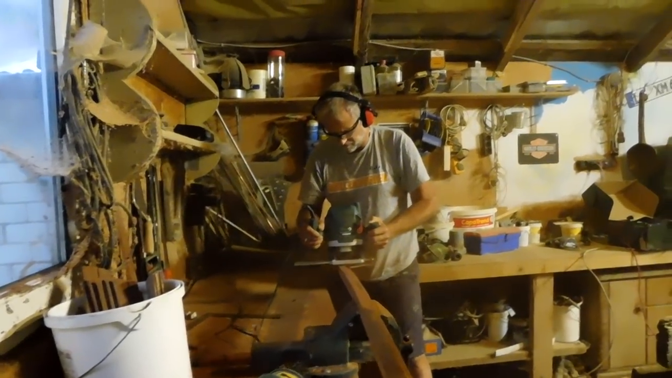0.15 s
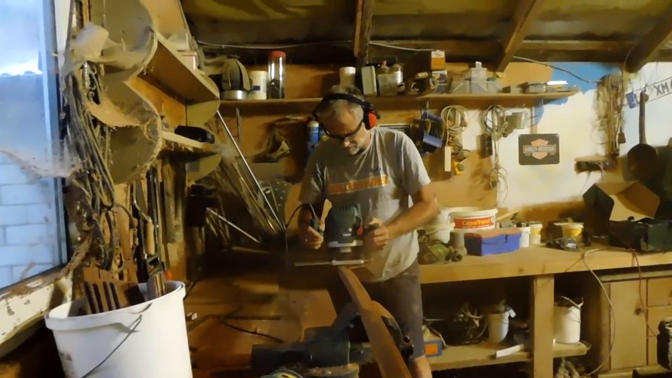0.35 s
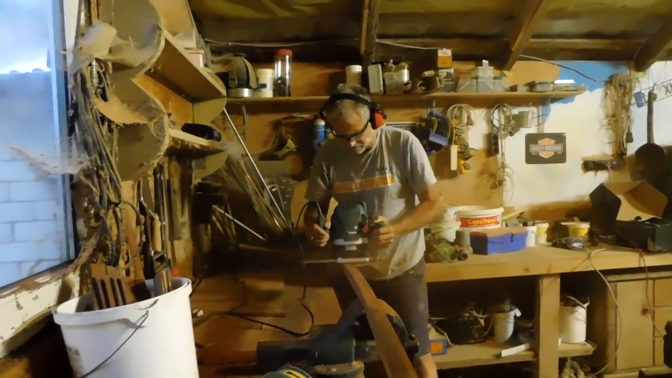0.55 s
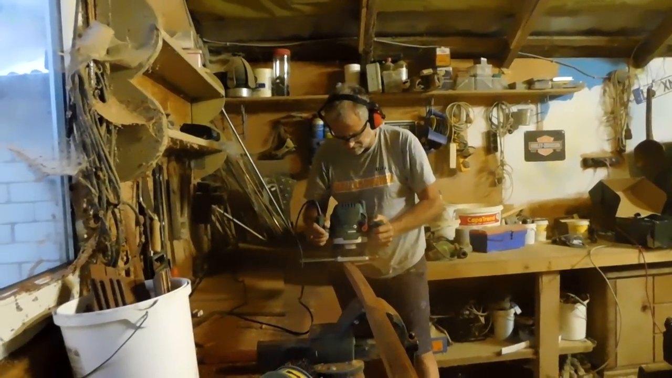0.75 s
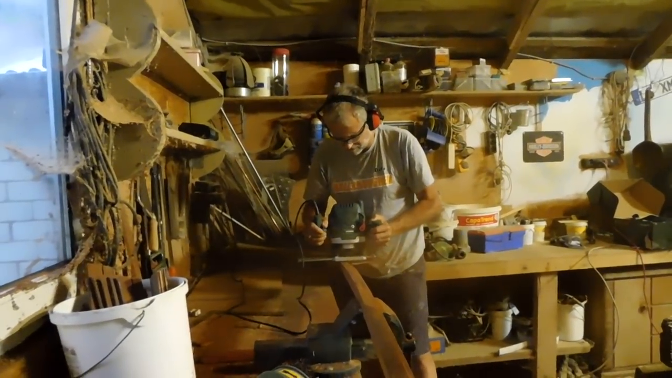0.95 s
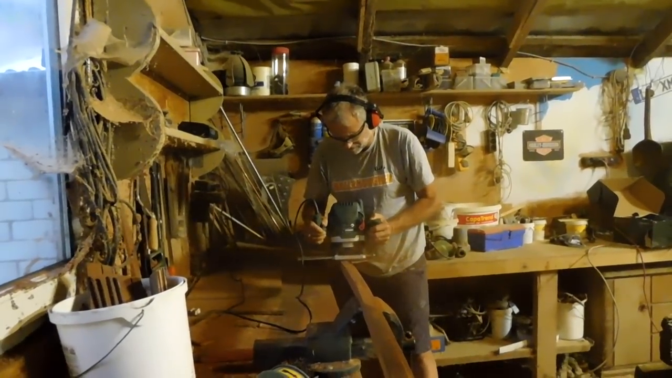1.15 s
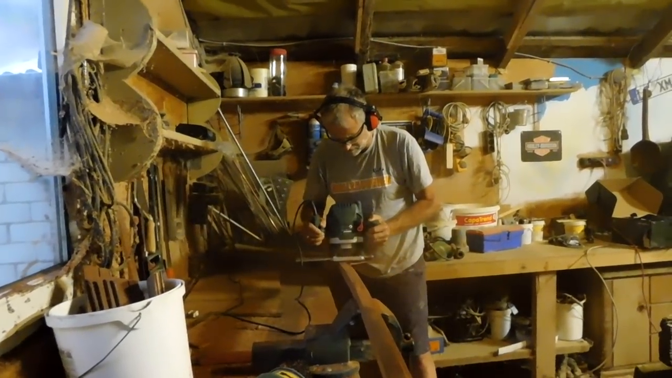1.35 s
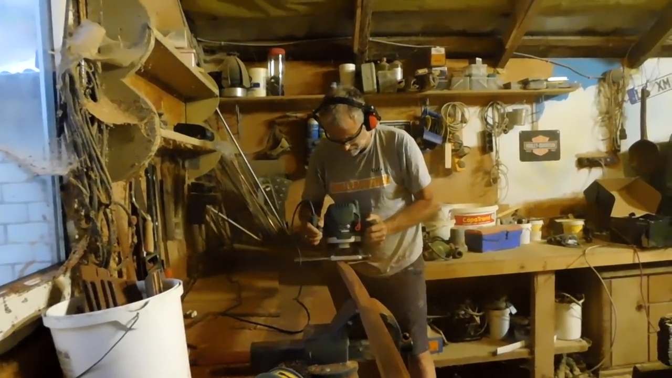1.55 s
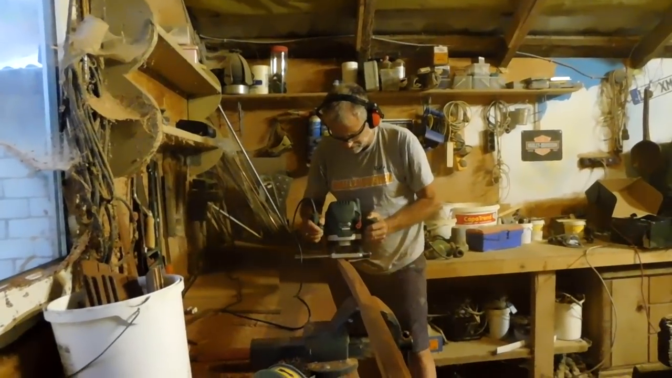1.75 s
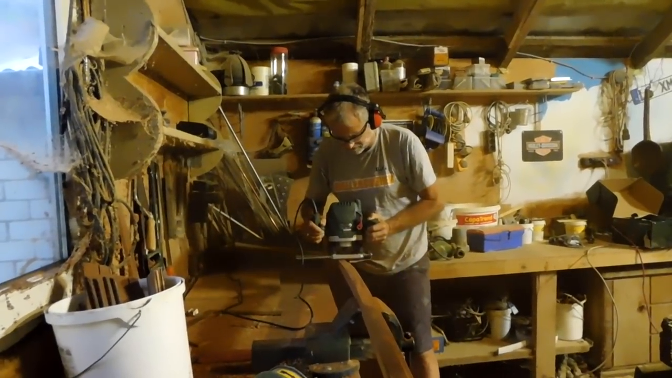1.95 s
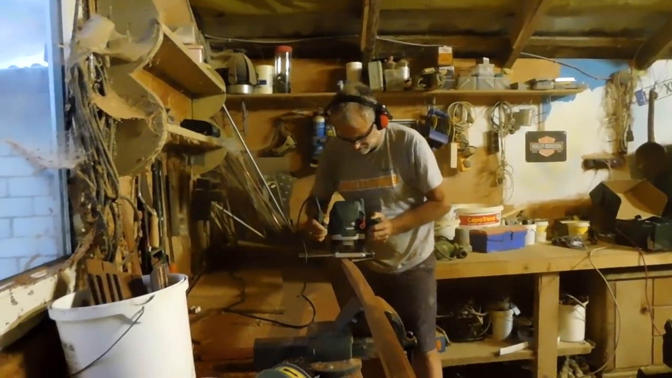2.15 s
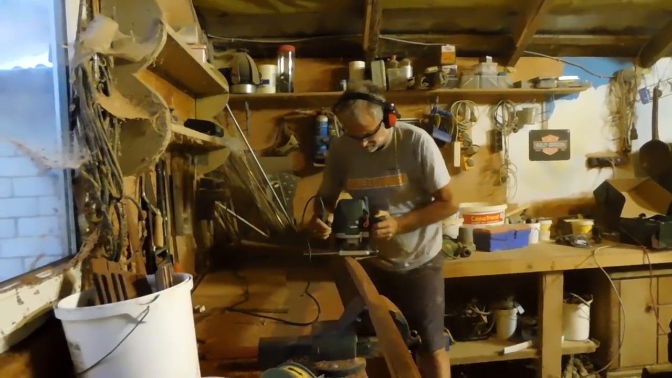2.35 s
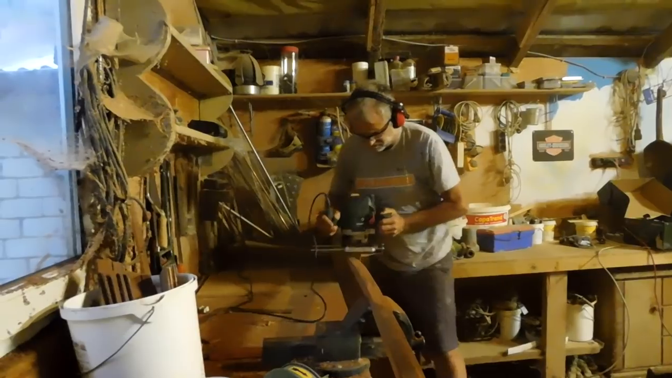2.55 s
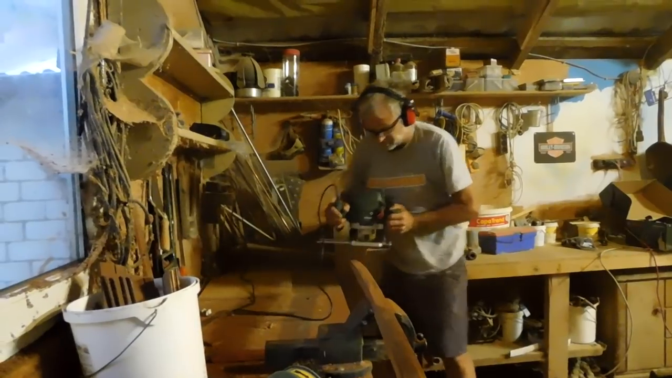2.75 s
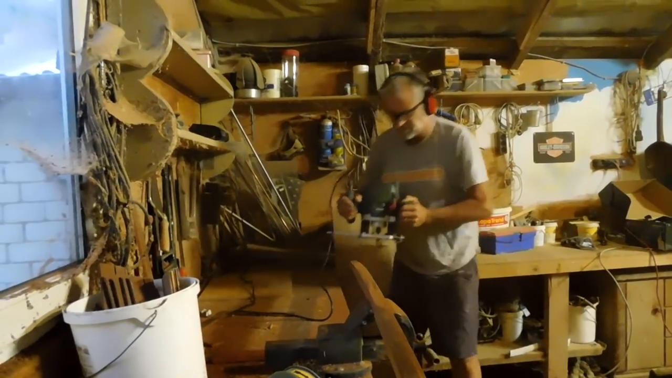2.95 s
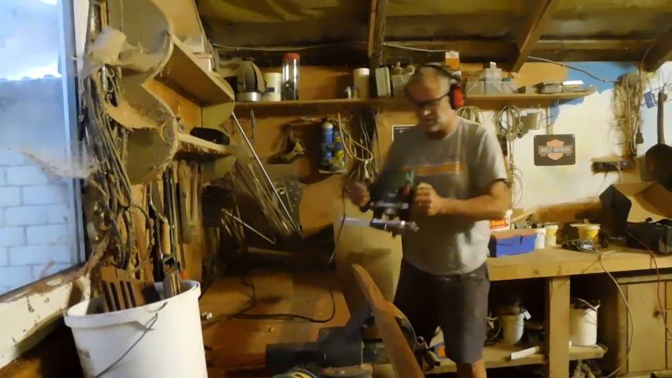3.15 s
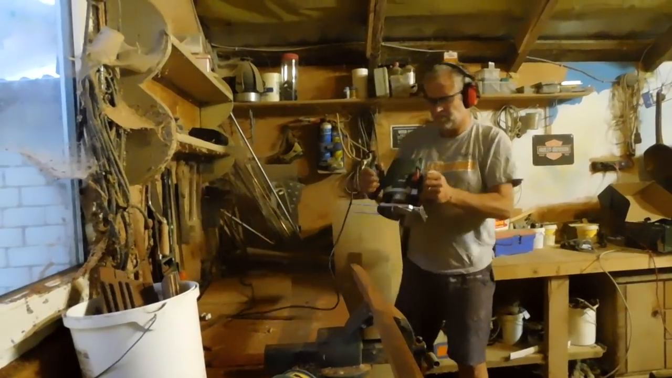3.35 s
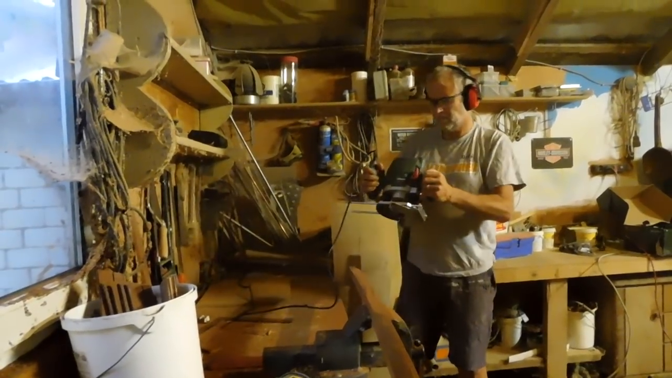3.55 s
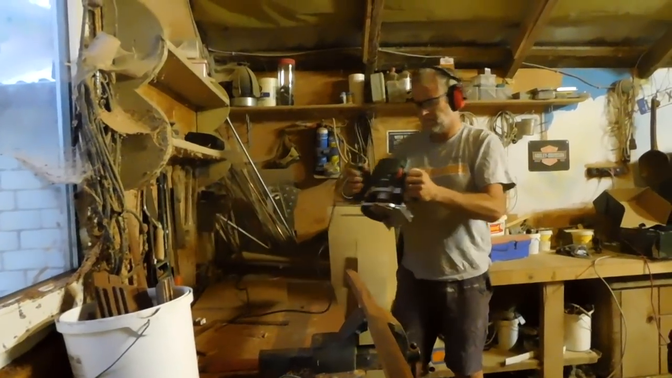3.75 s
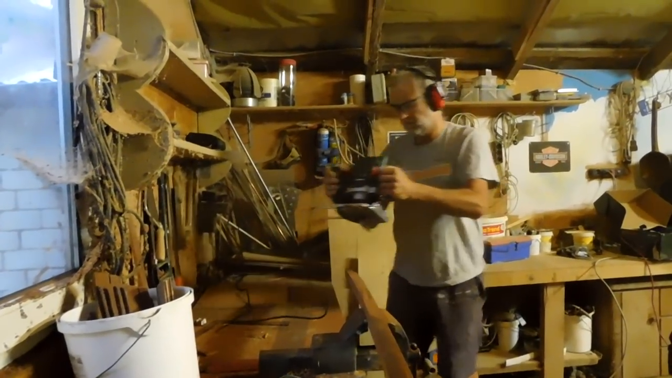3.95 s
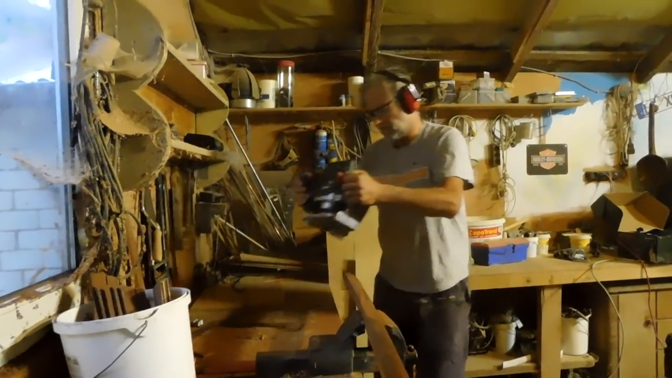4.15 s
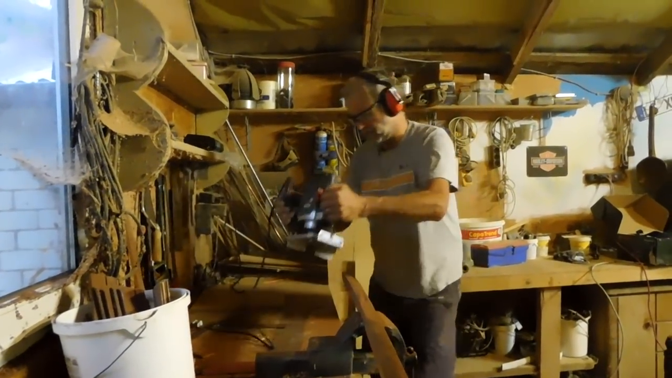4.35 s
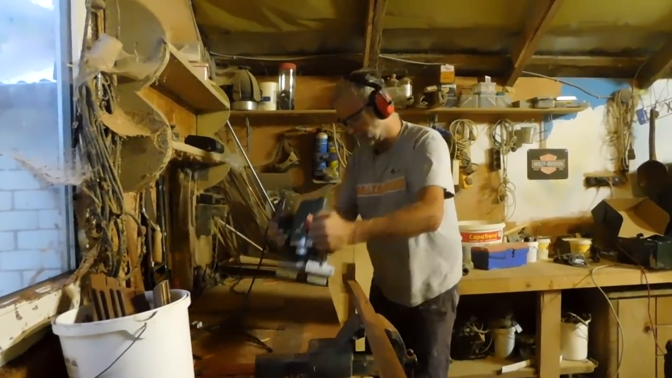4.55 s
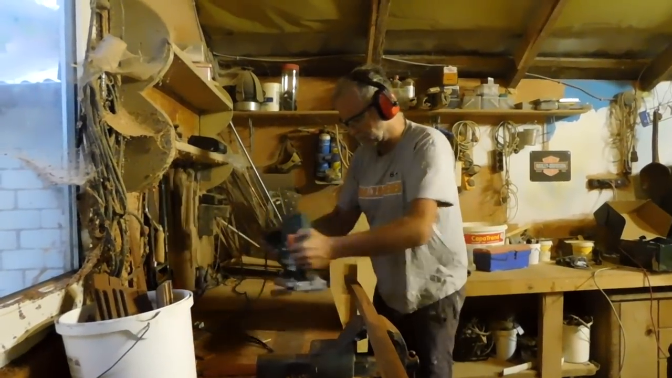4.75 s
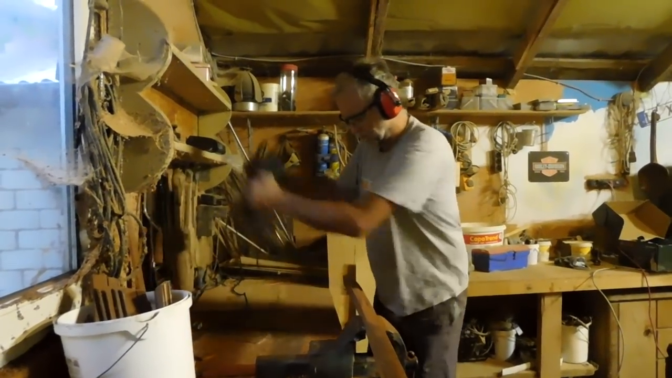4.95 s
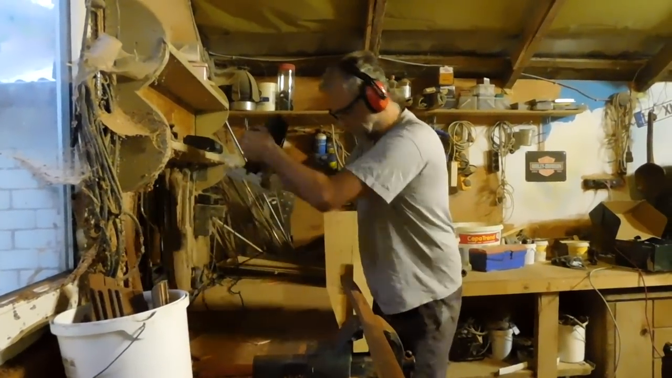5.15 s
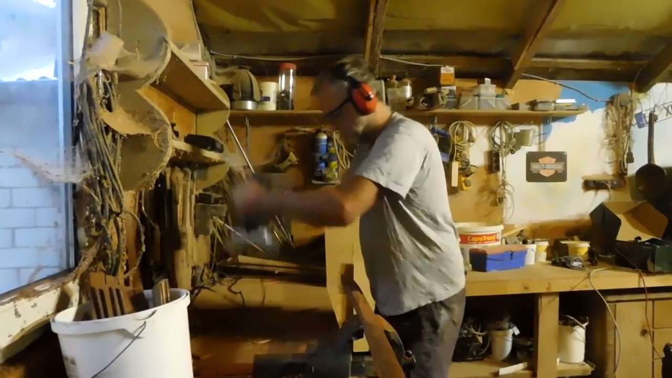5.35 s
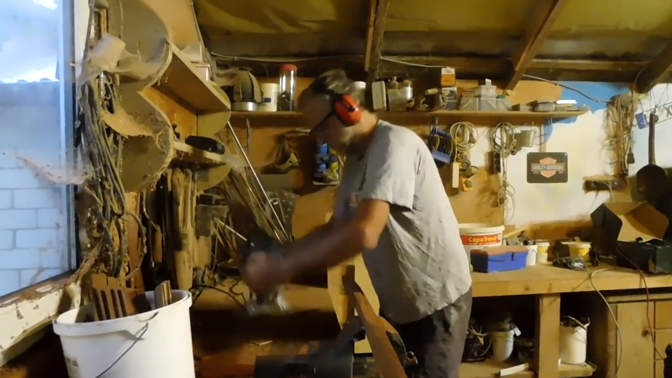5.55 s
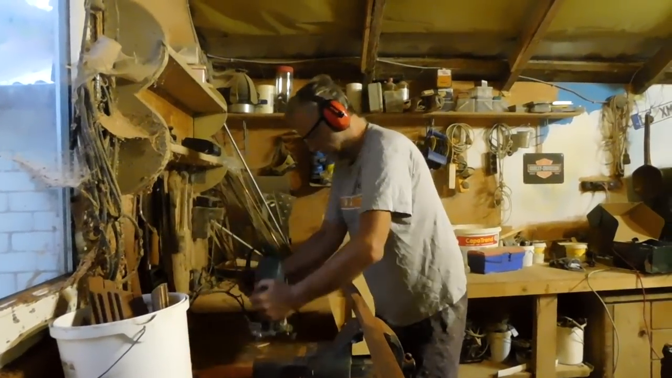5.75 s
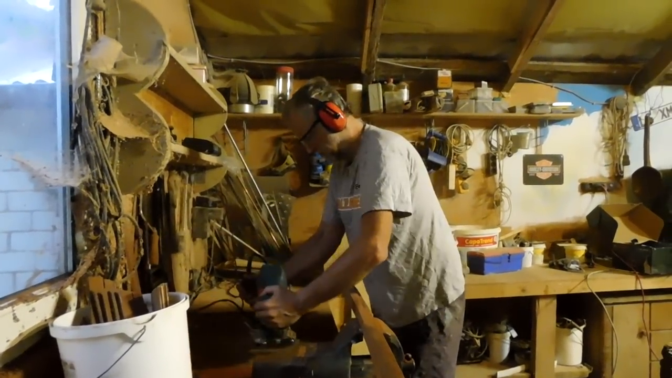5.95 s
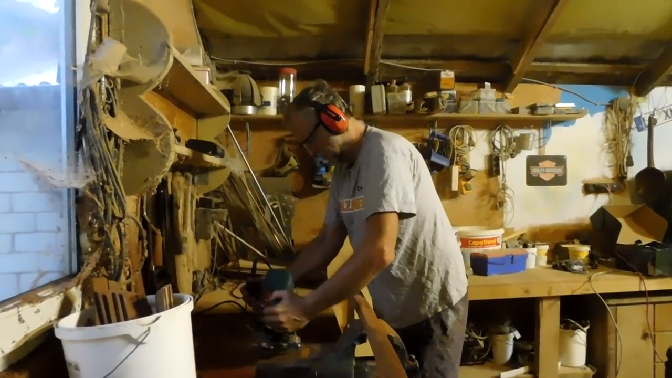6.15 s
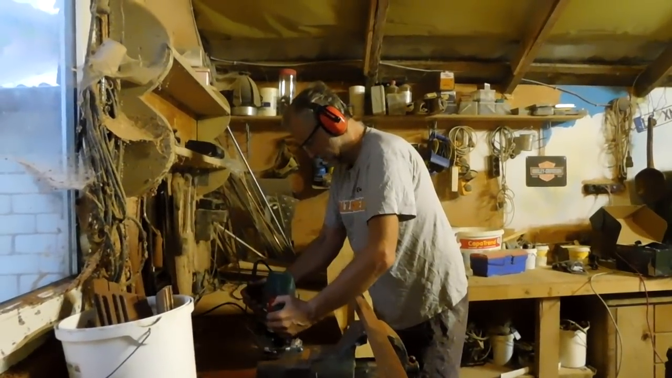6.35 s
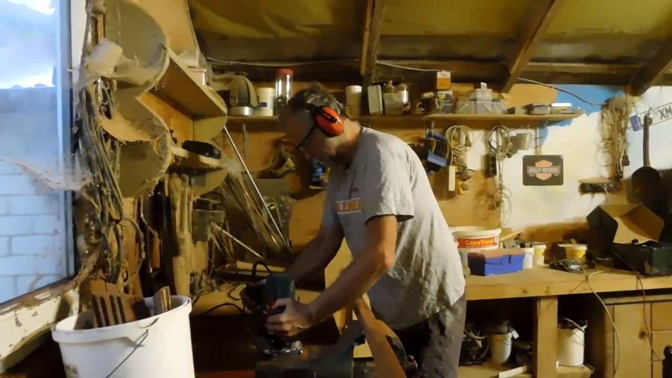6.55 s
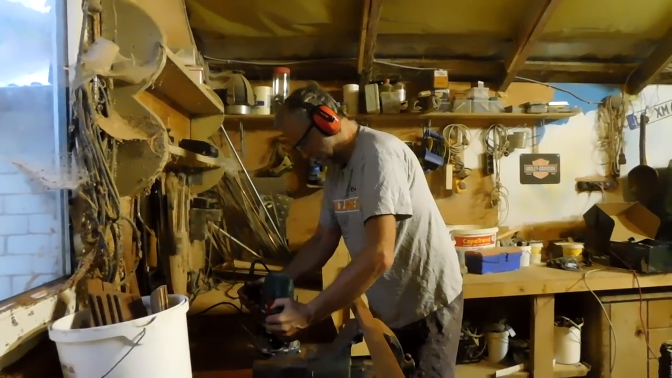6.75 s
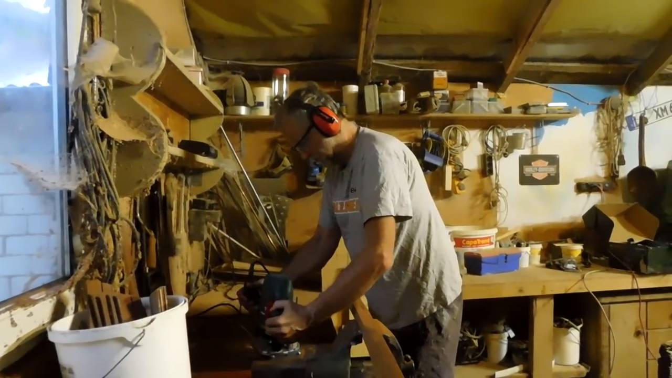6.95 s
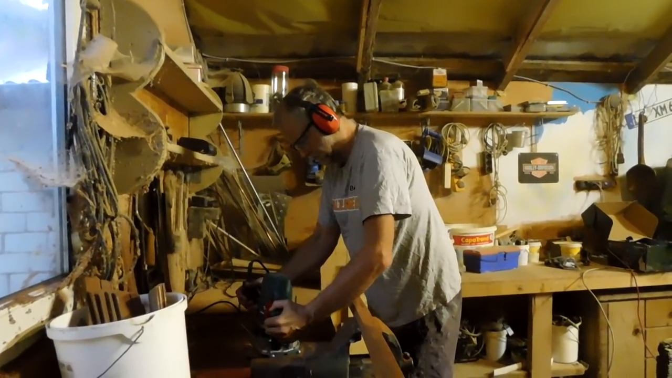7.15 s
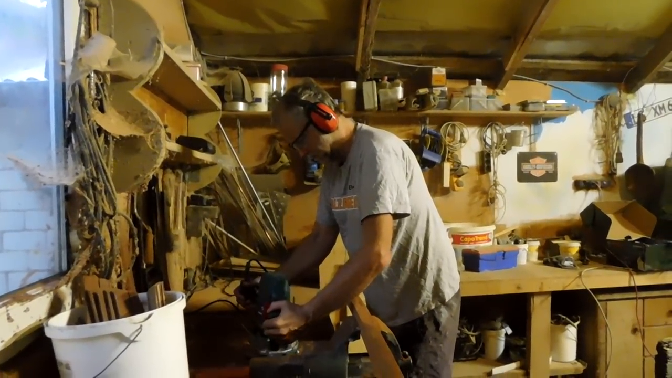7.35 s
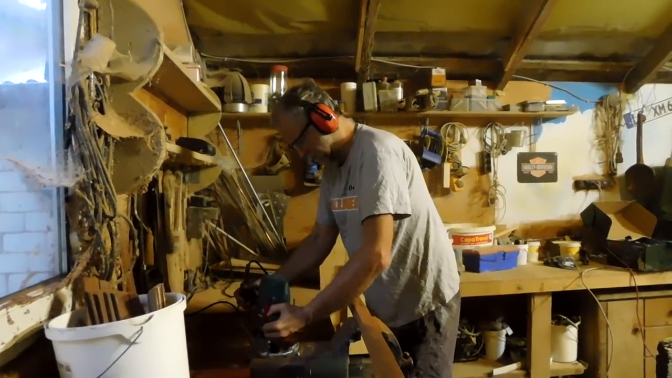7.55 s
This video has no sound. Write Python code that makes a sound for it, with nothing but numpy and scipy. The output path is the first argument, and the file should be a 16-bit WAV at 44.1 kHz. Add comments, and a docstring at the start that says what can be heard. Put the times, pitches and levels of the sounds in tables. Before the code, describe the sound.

In a cluttered wooden shed, a handheld electric router snarls roughly through a board for a second and a half. Freed from the wood, it rises to a smooth, loud whine with roaring fan air, then is switched off. The pitch slides down for nearly five seconds as the air fades; the tool knocks on the bench midway. Stereo microphone a few metres off, buffeted by gusts, short room reverberation.

```python
"""A hand router snarls through a board in a cluttered shed, is lifted out, runs free and is switched off.
Its bit, cooling fan and commutator are periodic sources: sines at whole multiples of the shaft speed.
Cooling air is broadband noise in bands; it roars, and blows on the microphone in gusts.
The coasting tool bumps the bench, heard as struck decaying modes with a rattle; the sound fades out twice."""
import sys
import numpy as np
from scipy import signal
from scipy.io import wavfile
from scipy.ndimage import uniform_filter1d

SR = 44100
rng = np.random.default_rng(int(sys.argv[2]) if len(sys.argv) > 2 else 0)


def persist_wave(psi):
    """Save psi, clipped to +-1, as 16-bit WAV."""
    counts = np.round(np.clip(psi, -1, 1) * 32767).astype(np.int16)
    wavfile.write(sys.argv[1], SR, np.atleast_2d(counts).T)


N = 339570

# Levels in these tables are those of each source ahead of random wander, room and mixing.
# Shaft under the load of the cut. Each row: time in seconds, speed in turns per second.
LOADED_SPEED = [(0, 417.6), (.2, 419.2), (.3, 412.1), (.4, 401.5), (.5, 407), (.7, 409.5), (.9, 405.2),
                (1.1, 406.3), (1.2, 410.2), (1.3, 412.5), (1.4, 417.4), (1.5, 427.8)]
# Shaft after the switch opens. Each row: time in seconds, speed in turns per second.
COAST_SPEED = [(2.5, 480), (2.7, 447.3), (3, 404.3), (3.3, 359.3), (3.5, 332), (3.75, 303), (4.05, 272.7),
               (4.35, 245.6), (4.8, 207.1), (4.95, 192.6), (5.4, 156), (5.7, 132.1), (6.15, 98.2),
               (6.6, 65.6), (7.02, 35.7), (7.26, 20)]
# The speed the free shaft tends to, and the time constant of its run-up.
FREE_TURNS_PER_S, RUN_UP_S = 487, .46

# Bit in the wood. Each row: time in seconds, then rms levels in dB of the flute tone, of its octave,
# of the buzz that sets the other cutting tones, and of the seventh shaft multiple.
CUT_LEVELS = [(0, -29.5, -41.5, -49, -35.5), (.14, -30.5, -45, -43, -33), (.21, -30.5, -37, -40.5, -36),
              (.265, -25.5, -44.5, -43.5, -34), (.3, -31.5, -32, -39.5, -39), (.37, -24, -30, -35.5, -41),
              (.49, -38.5, -40.5, -41, -39), (.56, -30, -27, -44, -41), (.7, -31.5, -32.5, -46, -50),
              (.84, -27.5, -25.5, -33.5, -34), (.92, -25.5, -28, -38, -32), (1.03, -24.5, -28, -33.5, -32),
              (1.13, -27, -24, -40, -42), (1.24, -28, -26.5, -46, -43), (1.33, -26.5, -31, -36, -40),
              (1.42, -31.5, -43, -48.5, -60), (1.52, -30.5, -43, -37, -43), (1.6, -68.5, -62.5, -65, -65)]
# Other cutting tones. Each row: shaft multiple, level above the buzz in dB,
# share of the buzz's swing around -42 dB.
CUT_OVERTONES = [(5, 0, 1.1), (6, -2, 1.04), (12, -7, -0.1)]
# Unbalance shaking the housing, first shaft multiple. Each row: pitch in Hz, rms level in dB.
UNBALANCE_FIRST = [(280, -86), (330, -70), (370, -50.5), (405, -51), (420, -60), (450, -52), (475, -64)]
# The same for the third shaft multiple. Each row: pitch in Hz, rms level in dB.
UNBALANCE_THIRD = [(850, -87), (1000, -67), (1160, -44), (1220, -41), (1255, -38), (1340, -60.5),
                   (1385, -39), (1425, -41.5), (1445, -51.5)]

# Eight-blade fan under power. Each row: time in seconds, blade tone rms level in dB.
FAN_POWERED = [(0, -34), (.12, -32), (.22, -37.5), (.3, -30), (.38, -31.5), (.55, -30.5), (.9, -32),
               (1.2, -32.5), (1.3, -37), (1.43, -31), (1.5, -37), (1.57, -30.5), (1.72, -30.5), (1.8, -36),
               (1.95, -22.5), (2.1, -35), (2.4, -35), (2.5, -32)]
# Blade tone while coasting, as the casing lets it out. Each row: pitch in Hz, rms level in dB.
FAN_COASTING = [(330, -78), (700, -64), (880, -48), (1030, -39.5), (1150, -39.5), (1215, -42.5),
                (1245, -50), (1300, -34), (1350, -45), (1385, -36.5), (1440, -42), (1540, -34.5),
                (1640, -43.5), (1730, -33.5), (1820, -37), (1900, -30.5), (2020, -43.5), (2095, -32.5),
                (2300, -44.5), (2420, -39), (2560, -36.5), (2710, -44), (2790, -29.5), (2900, -40.5),
                (3060, -31), (3240, -36), (3370, -36), (3450, -28), (3840, -28.5)]
# Fourth harmonic of the blade tone. Each row: pitch in Hz, rms level in dB.
FAN_FOURTH = [(3000, -82), (4500, -65), (6300, -63), (7400, -55), (8600, -60), (10500, -57), (12000, -57),
              (13200, -53), (14000, -50), (15200, -60.5)]
# Faint motor tones. Each row: shaft multiple, rms level in dB at full speed before radiation.
MOTOR_TONES = [(2, -45.5), (4, -49.5), (5, -47), (6, -54.5), (7, -55), (9, -52.5), (12, -57), (16, -51)]

# Tone of the 24 commutator bars. Each row: pitch in Hz, rms level in dB.
BAR_TONE = [(800, -82), (1000, -63), (1180, -70), (1400, -52.5), (2600, -52.5), (3500, -54.5), (4100, -53),
            (4600, -54), (5000, -52), (5600, -62), (7000, -59), (9800, -64.5), (11500, -57)]
# Overtones of the bar ticks. Each row: shaft multiple, rms level in dB before radiation.
BAR_OVERTONES = [(48, -48), (72, -52), (96, -56), (120, -60), (144, -64), (168, -67.5), (192, -75),
                 (216, -79), (240, -79), (264, -81.5)]
# Radiation of those overtones by the housing. Each row: frequency in Hz, gain in dB.
HOUSING_GAIN = [(900, -12), (1350, -9), (1800, -8), (2400, -6.5), (3300, -9.5), (4200, -9.5), (5000, -13.5),
                (5700, -6.5), (7000, -11.5), (8200, -4), (9600, -3), (11000, -6.5), (13000, -10.5),
                (15500, -17.5)]

# Cooling air. Each row: time in seconds, then rms levels in dB of roar, rush and hiss.
AIR_LEVELS = [(0, -38, -36, -39.5), (.3, -36.5, -36.5, -41.5), (.9, -35.5, -38.5, -42),
              (1.5, -37.5, -37, -41.5), (1.85, -36, -34.5, -40), (2.35, -34, -34.5, -39),
              (2.8, -36, -36.5, -39.5), (3.05, -36, -34.5, -38), (3.5, -36, -37.5, -41),
              (4.05, -37, -40, -43), (4.65, -38.5, -42.5, -49), (5.1, -42, -46, -49),
              (5.6, -47.5, -54.5, -51.5), (5.9, -50, -56.5, -55), (6.2, -52, -59.5, -57.5),
              (6.5, -54.5, -58.5, -62), (6.7, -54, -60, -68), (6.8, -63, -59, -66.5), (7.16, -64, -60, -75)]
# Spectra of the five air sources. Each row: frequency in Hz, relative density in dB per Hz.
BLAST_SPECTRUM = [(25, -5), (60, -5.5), (120, -3.5), (250, -5), (450, 0), (800, -17.5)]
DRONE_SPECTRUM = [(100, -13.5), (160, -13.5), (220, -1.5), (350, 3.5), (450, 0.5), (600, -20)]
ROAR_SPECTRUM = [(400, -18), (550, -12), (680, -1), (850, -2), (1100, 0), (1500, 1.5), (2200, -0.5),
                 (3200, -10), (5000, -21)]
RUSH_SPECTRUM = [(1200, -25.5), (2200, -1.5), (3300, 4.5), (5000, -0.5), (7000, -5), (10000, -15.5),
                 (16000, -22)]
HISS_SPECTRUM = [(4000, -8.5), (7000, -0.5), (10000, 0), (13000, -1), (16000, -6)]
# Air resonances of the casing. Each row: frequency in Hz, width in Hz, boost in dB.
CASING_MODES = [(862, 72, 6.5), (1127, 35, 2), (1465, 140, 2), (1630, 59, 2.5), (2010, 34, 2),
                (2780, 120, 4), (3390, 120, 3)]
# Gusts on the microphone. Each row: time in seconds, rise in dB, half length in seconds.
GUSTS = [(0, 5, .1), (.3, 9, 0.1), (.85, 8.5, 0.11), (1.114, 4.5, .12), (1.962, 10.5, 0.2),
         (2.598, 5.5, 0.25), (3.78, -2, .1), (4.5, 1.5, 0.4), (5.32, 8.5, 0.13), (5.618, 10, 0.28)]
# Sprays of chips brighten the hiss. Each row: time in seconds, rise in dB, half length in seconds.
CHIP_SPRAYS = [(.27, 3, .03), (.34, 5, 0.05), (.65, 0.5, .03), (.82, 1, .04), (1.1, 5.5, .04)]
# Blast: base level, and share of the roar's swing that it follows.
BLAST_DB, BLAST_FOLLOWS = -59.5, .45
# The vent stops pointing at the microphone: middle and length of the turn, change of the blast.
TURNED_AWAY_S, TURNING_S, AWAY_DB = 3.08, .28, -12.5
# Drone: base level, and shares of the swing of roar and gusts that it follows.
DRONE_DB, DRONE_FOLLOWS, DRONE_GUST_SHARE = -58, 0.61, 0.27

# Multiples that shake the handles. Each row: shaft multiple, rms level in dB on the resonance peak.
HANDLE_SHAKE = [(1, -68), (4, -71)]
HANDLE_HZ, HANDLE_WIDTH_HZ = 208, 22

# The tool bumps the bench. Each row: time in seconds, nominal peak in dB, extra dB in the lowest mode.
BUMPS = [(5.285, -66, 21), (5.315, -72, 29), (5.345, -68, 23), (5.4358, -30.5, -11), (5.441, -33, -12),
         (5.454, -45, -2), (5.483, -39, -1)]
# Modes of the bench. Each row: frequency in Hz, gain in dB, 60 dB decay time in seconds.
BENCH_MODES = [(144, -1.5, 0.039), (406, -16, 0.03), (760, -7, 0.07), (1150, 4, 0.03), (1490, 0, 0.016),
               (2090, -5, 0.028)]
# The rattle of each bump: level against its peak, decay time and band limits.
CRACK_DB, CRACK_T60_S, CRACK_LOW_HZ, CRACK_HIGH_HZ = -9, 0.096, 250, 2400

# Stereo width. Each row: frequency in Hz, side minus mid in dB before each source's offset.
SIDE_DB = [(25, 2), (60, -4.5), (110, 0.5), (200, -9), (380, -7), (700, -15), (1290, -9), (2380, -3),
           (4400, 0), (8120, -2.5), (15000, 0)]
# Stereo balance. Each row: frequency in Hz, left minus right in dB.
LEFT_DB = [(60, 5.5), (180, 4), (550, 0.5), (1200, 1.7), (2600, -1), (3600, 1.5), (5500, 3.5), (15000, 4.5)]
SHED_T60_S = 0.21
# The two fades. Each row: start in seconds, length in seconds.
FADES = [(6.999, 0.11), (7.162, 0.1)]
RETURN_S, RETURN_RISE_S, FADE_POWER = 7.12, 0.0055, 1.37
CUTOFF_HZ = 15750


def shaft():
    """Rotation: speed wavers along a table in the cut, relaxes upward once free, then coasts by a table."""
    t = np.arange(0, N / SR + .01, .005)
    free_s, free_speed = LOADED_SPEED[-1]
    rising = FREE_TURNS_PER_S - (FREE_TURNS_PER_S - free_speed) * np.exp((free_s - t) / RUN_UP_S)
    loaded = np.interp(t, *np.transpose(LOADED_SPEED))
    coasting = np.interp(t, *np.transpose(COAST_SPEED))
    unloaded = np.where(t < COAST_SPEED[0][0], rising, coasting)
    return in_time(np.transpose([t, np.where(t < free_s, loaded, unloaded)]))[0]


def tone(order, level_db, flutter_db, rate, wander_db):
    """Harmonic of rotation: phase is the integral of speed; level flutters most during a glide."""
    speed = shaft()
    hz = order * speed
    speed_change = np.abs(np.gradient(speed)) * SR      # turns per second, per second
    gliding = np.clip(uniform_filter1d(speed_change, size=8000) / 90, .3, 1)
    phase = 2 * np.pi * (order * np.cumsum(speed) / SR + rng.random()) + 0.26 * drift(rate)
    dips = np.minimum(drift(rate), .6)      # beating cancels deeply but adds little
    varied_db = level_db + flutter_db * gliding * dips + wander_db * drift(3.83)
    gain = np.sqrt(2) * from_db(varied_db) * (hz < CUTOFF_HZ)
    side_gain = from_db(at_hz(SIDE_DB, hz) - 3.0 + 1.5 * drift(3.7))
    side = side_gain * np.cos(phase + 0.25 * drift(6.3))
    return gain * stereo(np.sin(phase), side, hz)


def bit_and_rotor():
    """Periodic impact and unbalance: two flutes strike each turn; the rotor sounds on after the cut."""
    speed = shaft()
    flute_db, octave_db, buzz_db, seventh_db = in_time(CUT_LEVELS, after=-200)
    cutting_db = np.where(buzz_db > -100, 0, -200)      # silences the overtones after the cut
    buzz_swing_db = np.maximum(buzz_db, -70) + 42
    cut = [(2, flute_db), (4, octave_db), (7, seventh_db)]
    cut += [(k, db - 42 + share * buzz_swing_db + cutting_db) for k, db, share in CUT_OVERTONES]
    spin = [(1, at_hz(UNBALANCE_FIRST, speed)), (3, at_hz(UNBALANCE_THIRD, 3 * speed))]
    cutting = sum(tone(k, db, flutter_db=5.0, rate=18, wander_db=1.5) for k, db in cut)
    spinning = sum(tone(k, db, flutter_db=4.0, rate=7.9, wander_db=2.2) for k, db in spin)
    return cutting + spinning


def fan_and_motor():
    """Blade passing: eight blades per turn give a tone and harmonic; weak motor tones die with speed."""
    speed = shaft()
    blade_hz = 8 * speed
    powered = np.arange(N) / SR < COAST_SPEED[0][0]
    blade_db = np.where(powered, in_time(FAN_POWERED)[0], at_hz(FAN_COASTING, blade_hz))
    blades = tone(order=8, level_db=blade_db, flutter_db=4.5, rate=24, wander_db=0.95)
    fourth_db = at_hz(FAN_FOURTH, 4 * blade_hz)
    fourth = tone(order=32, level_db=fourth_db, flutter_db=8.0, rate=30, wander_db=4.0)
    fading_db = 36 * np.log10(speed / speed.max())
    weak = 0
    for k, db in MOTOR_TONES:
        radiated_db = db + fading_db + at_hz(ROAR_SPECTRUM[:4], k * speed)
        weak = weak + tone(k, radiated_db, flutter_db=9.0, rate=9, wander_db=1.5)
    return blades + fourth + weak


def commutator():
    """Periodic ticking: brushes pass 24 bars a turn; overtones slide down into hearing as it slows."""
    speed = shaft()
    bar_db = at_hz(BAR_TONE, 24 * speed)
    ticks = tone(order=24, level_db=bar_db, flutter_db=7.5, rate=21, wander_db=0.2)
    for k, db in BAR_OVERTONES:
        radiated_db = db + at_hz(HOUSING_GAIN, k * speed)
        ticks = ticks + tone(k, radiated_db, flutter_db=5.5, rate=37, wander_db=1.5)
    return ticks


def handles():
    """Resonance: a low hum swells each time a shaft multiple slides through the handles' own frequency."""
    speed, hum = shaft(), 0
    for k, db in HANDLE_SHAKE:
        detuning = (k * speed - HANDLE_HZ) / HANDLE_WIDTH_HZ
        hum = hum + tone(k, db - 20 * np.log10(1 + detuning ** 2), flutter_db=0, rate=8, wander_db=4)
    return hum


def air_sources():
    """Superposition: blast, drone, roar, rush and hiss, each a spectrum with its level per Hz over time."""
    t = np.arange(N) / SR
    roar_db, rush_db, hiss_db = in_time(AIR_LEVELS)
    gust_db = swells(GUSTS)
    turned = np.clip((t - TURNED_AWAY_S) / TURNING_S + .5, 0, 1)
    blast_db = BLAST_DB + AWAY_DB * turned + gust_db + BLAST_FOLLOWS * (roar_db + 39)
    drone_db = DRONE_DB + DRONE_FOLLOWS * (roar_db + 35.5) + DRONE_GUST_SHARE * gust_db
    levels = [(BLAST_SPECTRUM, blast_db), (DRONE_SPECTRUM, drone_db), (ROAR_SPECTRUM, roar_db),
              (RUSH_SPECTRUM, rush_db), (HISS_SPECTRUM, hiss_db + swells(CHIP_SPRAYS))]
    sources = []
    for shape, db in levels:
        every_hz = np.arange(round(shape[0][0]) + 1, round(shape[-1][0]) + 1)
        total_power = np.sum(from_db(2 * at_hz(shape, every_hz)))
        sources.append((shape, db - 10 * np.log10(total_power)))
    return sources


def air():
    """Turbulence: bands of noise carry the summed power of the air sources, coloured by casing resonances."""
    sources = air_sources()
    out, together = 0, drift(25)
    edges = 22 * 2 ** np.arange(0, 9.8, 1 / 2.5)      # Hz, 2.5 bands per octave
    slowed = 1 - shaft() / FREE_TURNS_PER_S
    white = rng.standard_normal((2, 2, N))      # neighbouring bands get unrelated noise
    for k, (low, high) in enumerate(zip(edges, edges[1:])):
        band = signal.butter(3 if low < 1500 else 2, [low, high], "band", fs=SR, output="sos")
        mid, side = signal.sosfilt(band, white[k % 2])
        hz = np.sqrt(low * high)
        power = sum(from_db(2 * (at_hz(shape, hz) + db)) for shape, db in sources
                    if shape[0][0] <= high and low <= shape[-1][0])
        dull_db = -14 * slowed * max(np.log2(hz / 8500), 0)      # slower air loses its top
        wander_db = 0.39 * together + 0.87 * drift(12) + .8 * drift(1.9)
        gain = np.sqrt(power * SR / 2) * from_db(dull_db + wander_db)
        out = out + gain * stereo(mid, from_db(at_hz(SIDE_DB, hz) + .5) * side, hz)
    for hz, width_hz, db in CASING_MODES:      # in series
        b, a = signal.iirpeak(hz, hz / width_hz, fs=SR)
        out = out + (from_db(db) - 1) * signal.lfilter(b, a, out)
    return out


def bumps():
    """Modal impact: each blow excites damped bench modes by chance amounts; soft ones mostly the lowest."""
    s, peak_db, lowest_db = np.transpose(BUMPS)
    at, out = (s * SR).astype(int), np.zeros(N)
    chance_db = rng.normal(0, 1.4, (len(BUMPS), len(BENCH_MODES)))
    for k, (hz, mode_db, t60) in enumerate(BENCH_MODES):
        clicks = np.zeros(N)
        strike_db = peak_db + mode_db + lowest_db * (k == 0) + chance_db[:, k]
        clicks[at] = from_db(strike_db) * (-1) ** k
        r, w = from_db(-60 / (t60 * SR)), 2 * np.pi * hz / SR
        # the tiny offset keeps the filter clear of denormal numbers
        out += signal.lfilter([0, np.sin(w)], [1, -2 * r * np.cos(w), r * r], clicks + 1e-18)
    clicks = np.zeros(N)
    clicks[at] = from_db(peak_db + CRACK_DB)
    decay = from_db(-60 / (CRACK_T60_S * SR))
    rattle = signal.lfilter([1], [1, -decay], clicks + 1e-18) * rng.standard_normal(N)
    band = signal.butter(2, [CRACK_LOW_HZ, CRACK_HIGH_HZ], "band", fs=SR, output="sos")
    out += signal.sosfilt(band, rattle) * np.sqrt(SR / 2 / CRACK_HIGH_HZ)
    # the bench radiates no deep bass
    out = signal.sosfilt(signal.butter(2, 90, "high", fs=SR, output="sos"), out)
    return out * from_db([[.5], [-.5]])      # left 1 dB above right


def shed(dry, wet_db, channels=2):
    """Reverberation: convolution with decaying noise makes gliding tones beat and streaks a roar."""
    t = np.arange(SR // 2) / SR
    noise = rng.standard_normal((channels, len(t)))      # one per side, or one shared
    tail = noise * from_db(-60 * t / SHED_T60_S) * (t > .004)
    tail = tail / np.sqrt(np.sum(tail ** 2, axis=1, keepdims=True))
    return dry + from_db(wet_db) * signal.fftconvolve(dry, tail, axes=1)[:, :N]


def stereo(mid, side, hz):
    """Sum and difference: left and right from mid and side, with a balance that depends on frequency."""
    tilt = from_db(at_hz(LEFT_DB, hz) / 2)
    return np.array([(mid + side) * tilt, (mid - side) / tilt])


def drift(rate):
    """Random modulation: noise through a two-pole low-pass with its corner near rate in Hz, spread 1."""
    r = np.exp(-80 * np.pi * rate / SR)      # runs at SR / 40
    slow = signal.lfilter([1], [1, -2 * r, r * r], rng.standard_normal(N // 40 + 2002))[2000:]
    return np.interp(np.arange(N) / 40, np.arange(len(slow)), slow / slow.std())


def swells(rows):
    """Triangular envelopes: brief changes in dB, straight to the peak and straight back."""
    t = np.arange(N) / SR
    return sum(db * np.clip(1 - np.abs(t - s) / half_s, 0, 1) for s, db, half_s in rows)


def in_time(rows, after=None):
    """Linear interpolation in time: the columns of a table, one value per sample."""
    s, *columns = np.transpose(rows)
    return [np.interp(np.arange(N) / SR, s, c, right=after) for c in columns]


def at_hz(points, hz):
    """Logarithmic pitch: a spectrum read on a log-frequency axis."""
    point_hz, value = np.transpose(points)
    return np.interp(np.log(hz), np.log(np.maximum(point_hz, 1)), value)


def from_db(db):
    """Level to amplitude: decibels to gain."""
    return 10 ** (np.asarray(db) / 20)


def scene():
    """Superposition of all sources; the fine whine reaches the microphone more by way of the walls."""
    tones = shed(bit_and_rotor(), wet_db=-27.5)
    tones = tones + shed(fan_and_motor(), wet_db=-10)
    tones = tones + shed(commutator(), wet_db=-3.0)
    moving_air = from_db(-0.94) * shed(air(), wet_db=-7.5, channels=1)
    return tones + handles() + moving_air + shed(bumps(), wet_db=-5)


def record(dry):
    """Envelope and band limit: a fade, a quick return and a second fade, then a steep low-pass."""
    t = np.arange(N) / SR
    first, second = (np.clip(1 - (t - s) / length_s, 0, 1) ** FADE_POWER for s, length_s in FADES)
    returning = np.clip((t - RETURN_S) / RETURN_RISE_S, 0, 1) ** 2
    fade = np.minimum(first + second * returning, 1)
    low_pass = signal.ellip(12, .5, 80, CUTOFF_HZ, fs=SR, output="sos")
    return signal.sosfilt(low_pass, dry * fade)


dry = scene()
out = record(dry)
persist_wave(out)
```